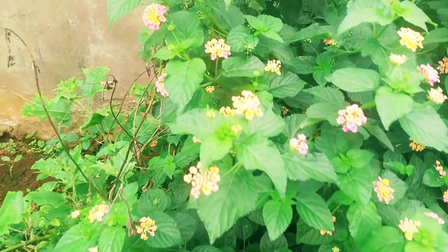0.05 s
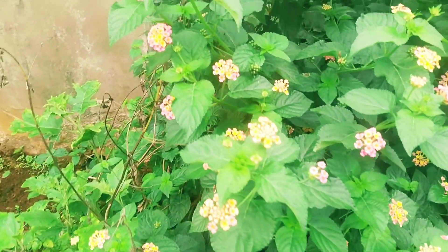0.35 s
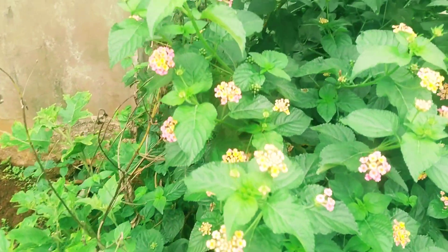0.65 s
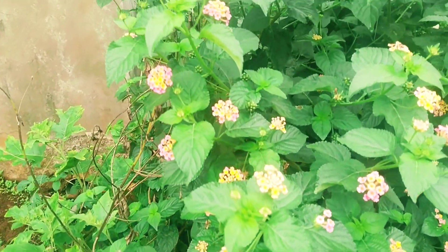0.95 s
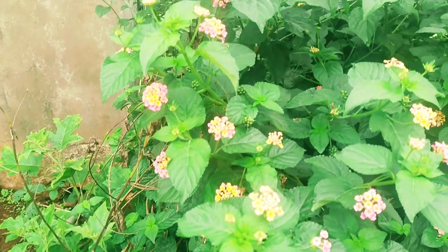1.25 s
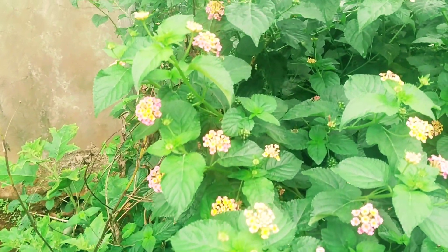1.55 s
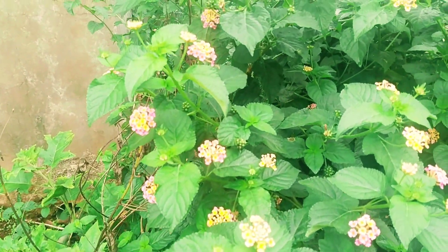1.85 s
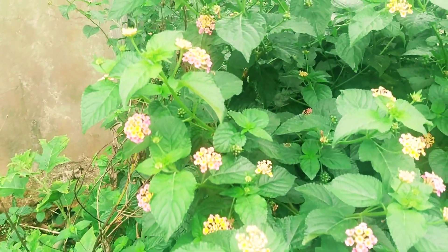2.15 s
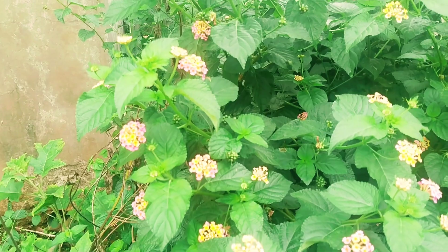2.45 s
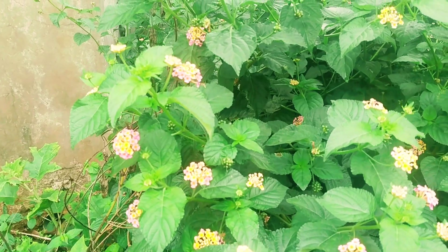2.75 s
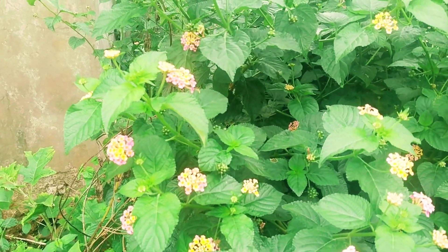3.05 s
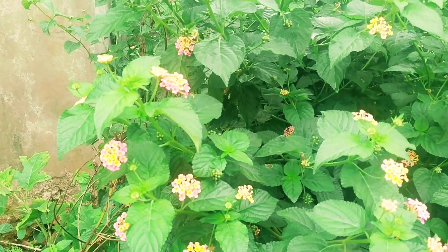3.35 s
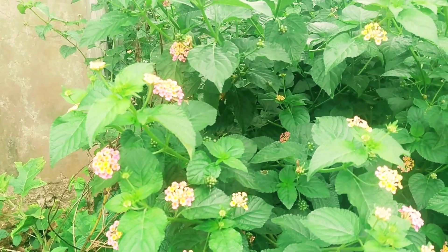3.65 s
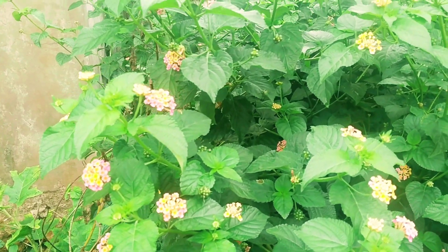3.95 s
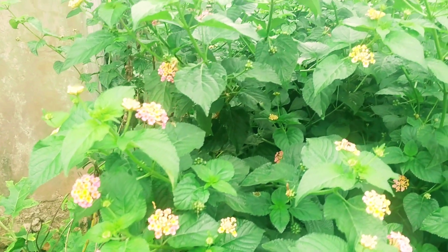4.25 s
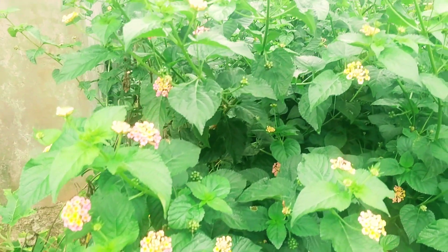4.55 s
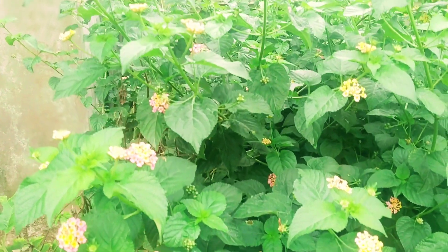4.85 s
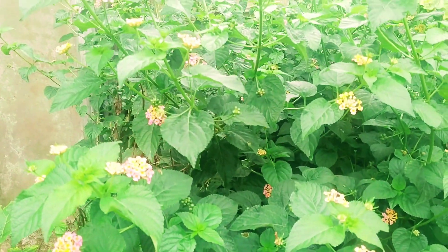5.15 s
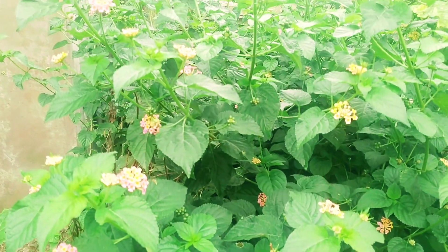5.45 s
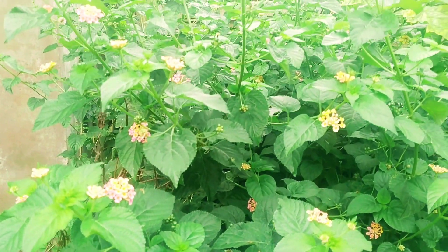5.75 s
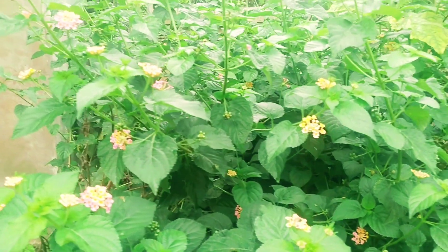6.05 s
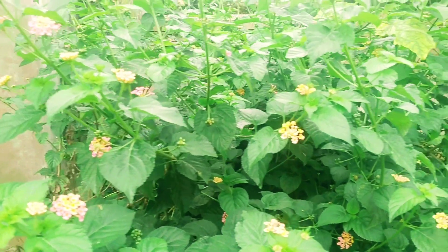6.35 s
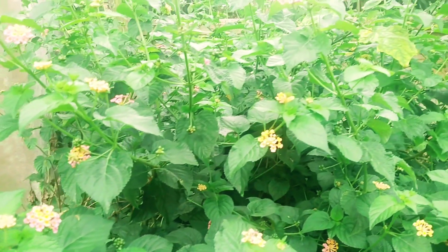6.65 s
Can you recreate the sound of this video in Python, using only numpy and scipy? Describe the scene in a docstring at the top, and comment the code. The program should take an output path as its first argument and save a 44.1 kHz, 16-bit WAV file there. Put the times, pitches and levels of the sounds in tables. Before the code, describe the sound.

A bird repeats sharp falling whistles while other birds chirp farther off and crickets pulse over a steady insect chorus in a garden.

```python
"""Sharp falling whistles, repeated by one bird, echo off the walls and foliage of a weedy garden.
Farther off, other birds warble, pip, chip and twitter, smeared by scattering in leaves; one bird hisses.
Three crickets stridulate in pairs of pulses and a bush cricket buzzes on and off over an insect chorus.
Friction makes scuffs in the plants nearby and twigs tick; under it all lie a rumble, a hum and a hush."""
import sys
import numpy as np
from scipy import signal
from scipy.fft import rfft, irfft
from scipy.io import wavfile

SR = 44100
rng = np.random.default_rng(int(sys.argv[2]) if len(sys.argv) > 2 else 0)


def unload_wav(signal):
    """Save mono or channel-first audio to the path in sys.argv[1] as 16-bit WAV at rate SR, clipped to [-1, 1]."""
    wavfile.write(
        sys.argv[1],
        SR,
        np.round(np.clip(np.atleast_2d(signal).T, -1, 1) * 32767).astype(np.int16),
    )


N = 304290


def whistler(top_hz=3107, bottom_hz=1534, resonance_hz=2395, skirt_db_per_octave=42, waver=0.013):
    """Resonance and reflection: a whistle dives an octave through the throat's favoured pitch and echoes."""
    # falling whistles: t/s, duration of the fall/s, relative level/dB
    whistles = [(1.702, 0.031, -34.5), (2.050, 0.043, -28.5), (2.350, 0.055, -27), (2.640, 0.059, -26.5),
                (3.813, 0.044, -32), (4.147, .049, -28), (4.473, 0.063, -26), (4.762, .056, -26.5),
                (5.045, 0.065, -26), (5.352, 0.062, -26), (5.677, 0.063, -26.5)]
    # reflections from ground and walls: delay/s, gain/dB
    echoes = [(.005, -7.5), (0.0176, -14.5), (.021, -13), (.031, -16), (0.045, -21)]
    rest = 0.38  # time held at the bottom pitch, as a share of the fall
    dry, walls = np.zeros((2, N))
    unsteady = 1 + waver * drift(60)
    for s, fall, db in whistles:
        u = np.arange(0, 1 + rest, 1 / (fall * SR))
        dive_hz = top_hz * (bottom_hz / top_hz) ** u
        hz = np.maximum(dive_hz * unsteady[round(s * SR):][:len(u)], bottom_hz)
        resonance_db = -skirt_db_per_octave * np.abs(np.log2(hz / resonance_hz))
        rest_db = -16.5 - 20 * ((u - 1) / rest - .3) ** 2
        add(dry, s, tone(hz, db - 1.33 + np.maximum(resonance_db, rest_db)))
    for delay, echo_db in echoes:
        add(walls, delay, amp(echo_db) * dry)
    # leaves throw back the top of the call more strongly than its bottom
    top = signal.sosfilt(signal.butter(5, 3000, "high", fs=SR, output="sos"), dry)
    leaves = amp(-7) * scatter(dry, t60=0.61, delay=0.036) + amp(7) * scatter(top, t60=0.54, delay=0.0085)
    return dry + walls + leaves


def warbler(soft_note_s=.035, step_s=.06, low_hz=1400, high_hz=2923, max_glide=.35):
    """Frequency modulation: slurred notes with a burr, and softer ones between, pass through foliage."""
    # clearest notes: t/s, duration/s, start f/Hz, end f/Hz, relative level/dB
    clear_notes = [(0, 0.012, 2850, 2840, -40), (.05, 0.021, 3050, 3390, -40.5),
                   (.13, 0.046, 1550, 1890, -51.5), (.154, 0.047, 2085, 2357, -42),
                   (.262, .06, 2700, 1433, -54.5), (.578, 0.049, 1900, 3330, -54.5),
                   (.768, 0.029, 2554, 2744, -42.5), (.931, 0.039, 2245, 1687, -57),
                   (1.069, 0.032, 3010, 2410, -48), (1.345, 0.038, 1600, 3100, -56.5),
                   (1.367, 0.03, 3050, 2830, -49), (1.42, 0.044, 1950, 1386, -58),
                   (1.575, 0.058, 1420, 1702, -54), (1.64, .03, 1944, 3310, -52),
                   (1.663, 0.032, 2910, 2820, -48), (2.266, .04, 1980, 1500, -53),
                   (2.385, .017, 2780, 3450, -47), (2.55, 0.028, 2587, 2640, -45.5)]
    # murmured phrases of soft notes: start t/s, end t/s, relative level/dB
    phrases = [(.85, 1.1, -58), (1.399, 1.8, -60)]
    dry, notes = np.zeros(N), list(clear_notes)
    for start, end, db in phrases:
        for s, (late, pitch, glide) in zip(np.arange(start, end, step_s), rng.random(size=(30, 3))):
            hz = low_hz * (high_hz / low_hz) ** pitch
            glide_hz = max_glide * hz * (2 * glide - 1)
            notes.append((s + late * step_s / 2, soft_note_s, hz - glide_hz / 2, hz + glide_hz / 2, db))
    for s, *note in notes:
        add(dry, s, slur(*note, arch_hz=48.7, burr_hz=100))
    early = scatter(dry, t60=0.057, delay=0.002)
    tail = scatter(dry, t60=0.52, delay=0.011)
    return amp(-0.5) * dry + early + amp(-1.5) * tail


def pipper(first_s=.022, period_s=.351, length_s=.026, hz=3160, rise_hz=170):
    """Periodic repetition: a bird's faint rising pip, its scattered sound stronger than the direct."""
    dry = np.zeros(N)
    for s in np.arange(first_s, N / SR, period_s):
        add(dry, s, slur(length_s, hz, hz + rise_hz, db=-59, burr_hz=130))
    return amp(-0.5) * dry + amp(4) * scatter(dry, t60=.2, delay=.003)


def far_birds(cycles=220, fall_hz=649):
    """Diffuse field: hoarse falling chips arrive from so far away that only scattered sound is heard."""
    # chips: t/s, start f/Hz, relative level/dB
    chips = [(1.095, 4100, -49.5), (1.47, 5900, -57), (1.83, 5900, -55), (1.938, 5850, -56),
             (2.21, 3780, -50), (2.625, 5900, -57.5), (3.135, 3590, -53.5), (3.298, 5950, -53),
             (3.87, 5870, -57), (4.0, 3860, -50), (4.017, 5800, -56), (4.61, 5950, -56), (5.294, 5830, -53),
             (5.383, 5750, -55), (5.87, 5830, -57), (6.111, 3930, -48), (6.39, 3900, -50),
             (6.67, 5700, -54)]
    dry = np.zeros(N)
    for s, hz, db in chips:
        add(dry, s, slur(cycles / hz, hz, hz - fall_hz, db, burr_hz=120))  # higher chips are shorter
    hoarse = dry * drift(380)
    early = scatter(hoarse, t60=0.067, delay=0.0017)
    tail = scatter(hoarse, t60=.45, delay=0.0059)
    return amp(-1) * early + amp(2.5) * tail


def twitter(length_s=0.018, top_hz=4650, bottom_hz=3980):
    """Fast downward sweeps sound like ticks; fainter ones come at random from farther bushes."""
    # a small bird's flicks of pitch: t/s, relative level/dB
    flicks = [(3.611, -40.5), (3.655, -37), (3.695, -34.5), (3.890, -38.5), (3.927, -36), (4.082, -40),
              (4.160, -37.5), (4.313, -44)]
    dry = np.zeros(N)
    for s, db in flicks:
        add(dry, s, slur(length_s, top_hz, bottom_hz, db))
    for when, pitch, distance in rng.random(size=(40, 3)):
        shift_hz = 450 * pitch
        flick = slur(length_s, top_hz + shift_hz, bottom_hz + shift_hz, db=-47 - 5 * distance)
        add(dry, when * N / SR, flick)
    return amp(-1.5) * dry + amp(-2.5) * scatter(dry, t60=0.32, delay=0.021)


def hissing_call(roughness_db=2.5):
    """Roughness: a bird's brief hissing call is broadband noise, made hoarse by fast changes of level."""
    # the call: t/s, rise/s, fall/s, level/dB
    call = (6.09, 0.03, .1, -49.5)
    # its spectrum: f/Hz, relative level/dB
    spectrum = [(1200, -24), (2000, -9), (2600, 0.5), (3600, -1), (5500, -6), (9000, -14), (10500, -30)]
    s, rise, fall, db = call
    envelope = amp(db) * curve([(s, 0), (s + rise, 1), (s + rise + fall, 0)])
    return envelope * noise(spectrum) * amp(roughness_db * drift(200))


def cricket(stretches, top_hz, sag_hz, stroke_s, spacing_s, wet_db, t60, wander_hz=14, uneven_db=0.77):
    """Stridulation: two wing strokes make a chirp, and the pitch follows the speed of the scraper."""
    u, dry = np.linspace(-1, 1, int(stroke_s * SR)), np.zeros(N)
    sag = sag_hz * (u + 0.14) ** 2  # the scraper reaches top speed before mid-stroke, then slows
    slip_hz = 22 * drift(150)
    for first, end, period, db in stretches:
        for s, (force, tuning) in zip(np.arange(first, end, period), rng.standard_normal(size=(30, 2))):
            for middle in (s, s + spacing_s):
                hz = top_hz + wander_hz * tuning - sag + np.roll(slip_hz, -int(middle * SR))[:len(u)]
                add(dry, middle - stroke_s / 2, tone(hz, db + uneven_db * force) * (1 - u ** 2))
    return dry + amp(wet_db) * scatter(dry, t60, delay=.0055)


def crickets():
    """The ratio of direct to scattered sound sets three crickets, each with its own pitch, at a distance."""
    # stretches of chirping at a steady tempo: first pulse t/s, end t/s, chirp period/s, relative level/dB
    near_chirps = [(.076, 1.42, .2445, -37.5), (1.996, 3.33, .243, -35.5), (4.276, 6.08, 0.24, -35),
                   (6.203, 6.82, .2445, -35.5)]
    far_chirps = [(.238, 4.41, .2387, -44), (6.675, 6.82, .24, -44.5)]
    low_chirps = [(.35, 1.7, .252, -44.5), (2.118, 3.18, .237, -42), (3.69, 4.28, .235, -47),
                  (6.04, 6.82, 0.22, -44)]
    near = cricket(near_chirps, top_hz=6971, sag_hz=270, stroke_s=.034, spacing_s=.055, wet_db=-10, t60=.19)
    far = cricket(far_chirps, top_hz=6840, sag_hz=209, stroke_s=.036, spacing_s=.054, wet_db=2.5, t60=.17)
    low = cricket(low_chirps, top_hz=4796, sag_hz=330, stroke_s=.026, spacing_s=.043, wet_db=-.5, t60=.39,
                  wander_hz=50)
    return amp(-0.84) * near + amp(1.5) * far + amp(-2.5) * low


def bush_cricket(stroke_hz=119, depth=0.19, rise_s=0.28, fall_s=0.098):
    """Amplitude modulation: fast wing strokes pulse a thin band of noise that swells and stops."""
    # buzzes: start t/s, end t/s, level/dB
    buzzes = [(-.3, 0.443, -67.5), (0.558, 1.243, -67), (1.526, 2.156, -64), (2.255, 2.963, -66),
              (3.113, 3.81, -65), (3.953, 4.622, -65), (5.93, 6.443, -65), (6.636, 7.2, -64.5)]
    # spectrum of the buzz: f/Hz, relative level/dB
    spectrum = [(7500, -29.5), (8600, -8.5), (9200, -1), (9570, 5), (10000, -8), (10400, -20),
                (11000, -41.5)]
    t = np.arange(N) / SR
    envelope = sum(amp(db) * np.clip(np.minimum((t - start) / rise_s, (end - t) / fall_s), 0, 1)
                   for start, end, db in buzzes)
    strokes = sine(stroke_hz * (1 + 0.0097 * drift(3.3)))
    return envelope * (1 + depth * strokes) * noise(spectrum)


def plants(attack_s=0.0029):
    """Friction and damped vibration: gritty scuffs over a soft thud, and twig ticks that die away."""
    # scuffs: t/s, duration/s, rasp level/dB, thud level/dB
    scuffs = [(.448, 0.012, -34, -55), (0.455, 0.048, -39.5, -69), (0.474, 0.027, -43, -65),
              (0.495, 0.034, -41, -64), (0.565, 0.011, -55, -67), (0.587, 0.15, -59, -69),
              (0.695, 0.11, -52, -51), (.755, 0.042, -50.5, -57), (0.792, 0.068, -54, -48.5)]
    # ticks of twigs and leaves: t/s, time to decay by 60 dB/s, level/dB
    ticks = [(2.826, 0.011, -53), (3.054, 0.011, -62), (5.591, 0.052, -38.5), (6.675, 0.014, -57)]
    # spectra of rasp, thud and tick: f/Hz, relative level/dB
    rasp_spectrum = [(180, -58), (300, -28), (369, -45), (497, -13.5), (594, -24), (835, -7), (1010, -7),
                     (1430, -9), (2130, -2), (2580, -7), (4610, -17), (5840, -26), (6780, -26), (7410, -30),
                     (10400, -34), (13500, -65), (22000, -120)]
    thud_spectrum = [(40, -23), (90, 10.5), (150, -20), (250, 10.5), (330, -17), (600, -29), (850, -18),
                     (1300, -45)]
    tick_spectrum = [(700, -38), (2000, -19), (2800, 12.5), (3600, 4), (4500, -11), (7000, -15),
                     (10000, -18), (11000, -36)]
    # a faint sinking ring after the first scuff: t/s, duration/s, start f/Hz, end f/Hz, level/dB
    ring_note = (.5, 0.46, 930, 740, -60)
    t = np.arange(N) / SR
    rasp, thud, tick, ring = np.zeros((4, N))
    for s, length, rasp_db, thud_db in scuffs:
        stroke = np.clip(np.minimum((t - s) / attack_s, 2 * (s + length - t) / length), 0, 1)
        rasp += amp(rasp_db) * stroke
        thud += amp(thud_db) * stroke
    for s, t60, db in ticks:
        add(tick, s, amp(db) * np.exp(-np.log(1000) * t[:SR // 2] / t60))
    add(ring, ring_note[0], slur(*ring_note[1:], burr_hz=110))
    grit = rasp * noise(rasp_spectrum) * amp(1.2 * drift(400))
    dry = grit + thud * noise(thud_spectrum) + tick * noise(tick_spectrum) + ring
    return dry + amp(-16) * scatter(dry, t60=0.42, delay=.015)


def chorus(high_db=-52.5, shimmer_db=1.56, swell_db=0.54):
    """Incoherent summation: distant insects merge into two noise bands; the nearest trills show through."""
    # spectra of the two registers: f/Hz, relative level/dB
    low_spectrum = [(3000, -31.5), (3700, -17), (4000, -5.5), (4300, 3.5), (4650, 4.5), (4900, 0),
                    (5150, -7.5), (5450, -36), (7000, -47.5)]
    high_spectrum = [(5500, -46), (5900, -16.5), (6100, -3), (6300, 6), (6550, 9), (6800, -2), (7000, -9.5),
                     (7250, -15.5), (7800, -66)]
    # course of the lower band: t/s, level/dB
    low_levels = [(0, -50), (1.8, -51), (3.4, -50.5), (3.65, -48), (4.1, -49), (4.4, -50.5), (5.8, -51.5),
                  (6.3, -49.5), (6.9, -51.5)]
    trill = 1 + 0.16 * sine(hz=61 + drift(3.7)) + 0.11 * sine(hz=144 + drift(3.7))
    low = noise(low_spectrum) * amp(curve(low_levels) + shimmer_db * drift(21))
    high = noise(high_spectrum) * amp(high_db + swell_db * drift(3.9))
    return low + trill * high


def air(hush_db=-63):
    """Ambient noise: a far-off rumble, a faint wavering hum and the even hush of open air superpose."""
    # partials of the hum: f/Hz, level/dB
    partials = [(139, -64), (167, -65), (236, -80), (300, -73)]
    # swell of the hum: t/s, gain/dB
    swell = [(0, -0.5), (2, 2), (4.7, 1), (5.6, -5.5), (6.2, -3), (6.6, 6), (6.9, 12)]
    # spectra of rumble and hush: f/Hz, relative level/dB
    rumble_spectrum = [(20, -19.5), (40, -8.5), (60, -2.5), (95, 1.5), (118, -4), (180, -6.5), (230, -12.5),
                       (360, -17), (480, -29), (700, -44.5)]
    hush_spectrum = [(300, -4), (490, -8.5), (600, 1), (900, -2.5), (1050, -8), (1400, -6), (2600, -5),
                     (5500, -9), (7700, -17.5), (9700, -13), (10500, -37.5)]
    # course of the rumble: t/s, level/dB
    rumble_levels = [(0, -56.5), (.6, -54.5), (1.8, -55), (2.5, -58.5), (4.75, -58), (5.0, -54), (5.3, -58),
                     (6.9, -53.5)]
    hum = sum(tone(hz + 3 * drift(5), db + curve(swell) + 2 * drift(3)) for hz, db in partials)
    rumble = noise(rumble_spectrum) * amp(curve(rumble_levels))
    return rumble + hum + amp(hush_db) * noise(hush_spectrum)


def scatter(x, t60, delay, count=3, clump_db=3):
    """Multiple scattering: leaves and stems return a clumpy, decaying tail that changes as they sway."""
    t = np.arange(SR) / SR
    decay = np.exp(-np.log(1000) * t / t60) * (1 - np.exp(-(t / delay) ** 2))
    out, knots = np.zeros(N), np.linspace(0, 1, 160)
    for k in range(count):
        clumps = amp(clump_db * np.interp(t, knots, rng.standard_normal(len(knots))))
        taps = rng.choice([-1, 1], SR) * (rng.random(SR) < .1) * decay * clumps
        sway = np.sqrt(2 / count) * np.cos(np.pi * (np.arange(N) / SR + k / count))
        out += signal.fftconvolve(x * sway, taps / np.linalg.norm(taps))[:N]
    return out


def slur(length, start_hz, end_hz, db, arch_hz=0, burr_hz=0):
    """A glide that swells and fades; its pitch bows upward by arch_hz and shakes by burr_hz."""
    u = np.linspace(0, 1, int(length * SR))
    knots = np.arange(200) / 700
    shake = np.interp(u * length, knots, rng.standard_normal(len(knots)))
    bow = np.sin(np.pi * u)
    return tone(start_hz + (end_hz - start_hz) * u + arch_hz * bow + burr_hz * shake, db) * bow


def tone(hz, db):
    """A pure tone of random phase that follows pitch and level curves, with tapered ends."""
    return amp(db) * sine(hz, rng.random()) * signal.windows.tukey(len(hz), .1)


def sine(hz, start_turns=0):
    """Phase is the running integral of frequency."""
    return np.sin(2 * np.pi * (np.cumsum(hz) / SR + start_turns))


def noise(spectrum):
    """Spectral shaping: noise of rms 1 from points of f/Hz, relative level/dB."""
    hz, db = np.transpose(spectrum)
    log_hz = np.log(np.fft.rfftfreq(N, 1 / SR) + 1)
    return shaped_noise(amp(np.interp(log_hz, np.log(hz + 1), db, left=-90, right=-90)))


def drift(rate_hz):
    """Random fluctuation of rms 1, band-limited to about rate_hz."""
    return shaped_noise(np.exp(-(np.fft.rfftfreq(N, 1 / SR) / rate_hz) ** 2))


def shaped_noise(gains):
    """White noise weighted frequency by frequency, then scaled to rms 1."""
    x = irfft(rfft(rng.standard_normal(N)) * gains, N)
    return x / np.sqrt(np.mean(x ** 2) + 1e-20)


def curve(points):
    """Linear interpolation through points of t/s, value."""
    return np.interp(np.arange(N) / SR, *np.transpose(points))


def amp(db):
    """Amplitude ratio of a level in decibels."""
    return 10 ** (np.asarray(db) / 20)


def add(mix, s, sound):
    """Superposes a sound on the mix at time s."""
    start = round(s * SR)
    sound = sound[max(-start, 0):]
    part = mix[max(start, 0):][:len(sound)]
    part += sound[:len(part)]


def scene():
    """Superposition: the pressures from birds, insects, plants and open air add at one point."""
    songs = whistler() + warbler() + pipper() + far_birds() + twitter()
    return (songs + crickets() + bush_cricket() + chorus() + plants() + hissing_call() + air())[None]


def record(dry):
    """Band limiting: a steep low-pass filter removes the highest treble."""
    cutoff_hz = 10600
    lowpass = signal.firwin(401, cutoff_hz, window=("kaiser", 8), fs=SR)
    return signal.oaconvolve(dry, lowpass[None], "same")


dry = scene()
out = record(dry)
unload_wav(out)
```